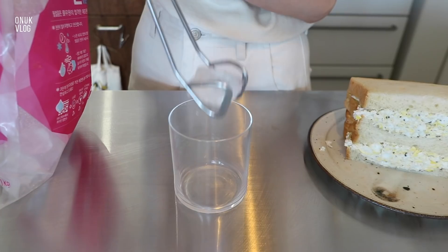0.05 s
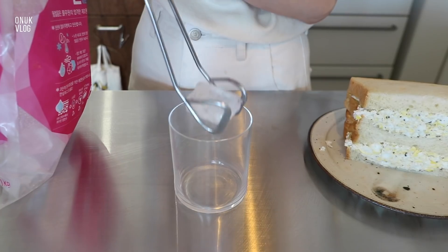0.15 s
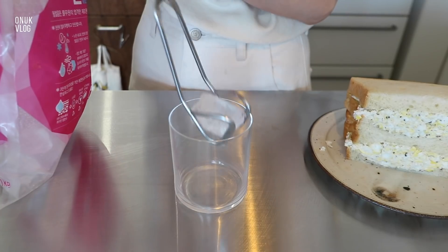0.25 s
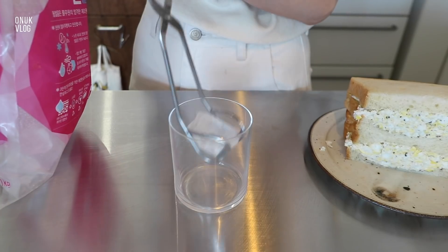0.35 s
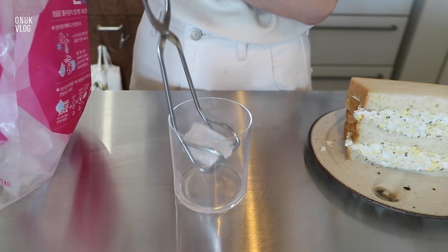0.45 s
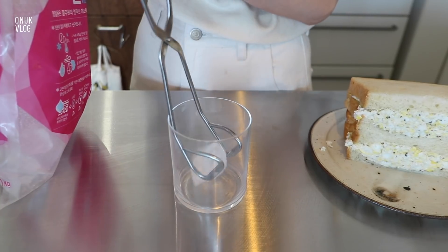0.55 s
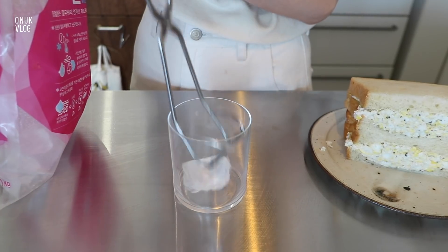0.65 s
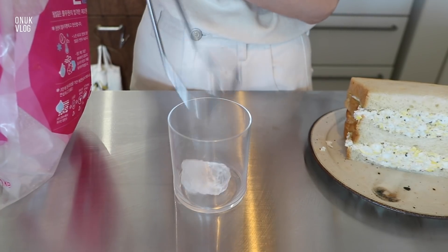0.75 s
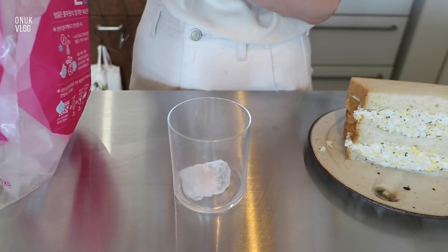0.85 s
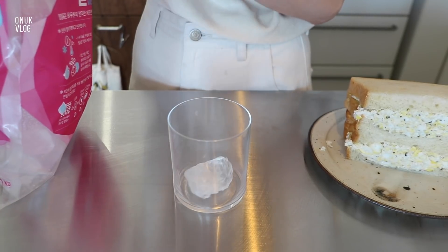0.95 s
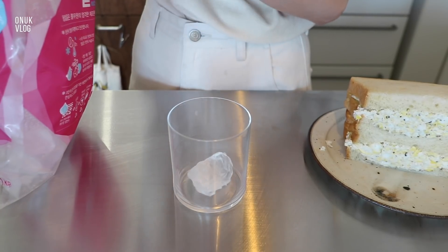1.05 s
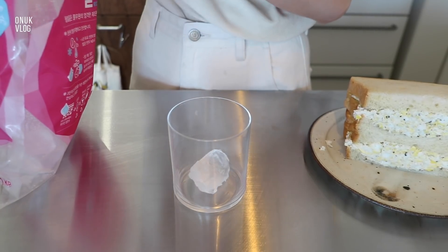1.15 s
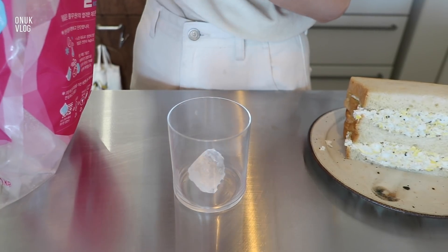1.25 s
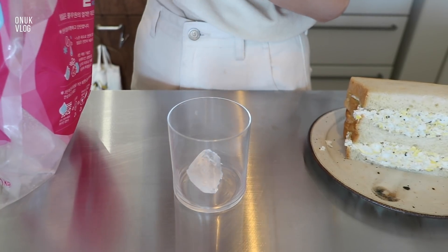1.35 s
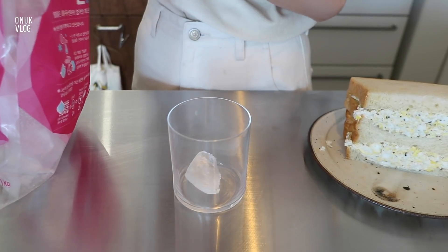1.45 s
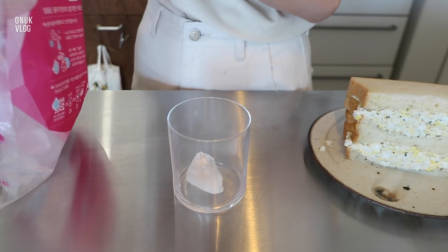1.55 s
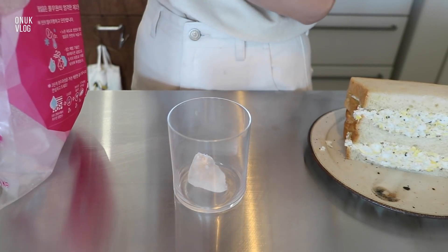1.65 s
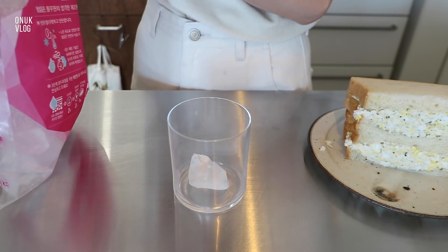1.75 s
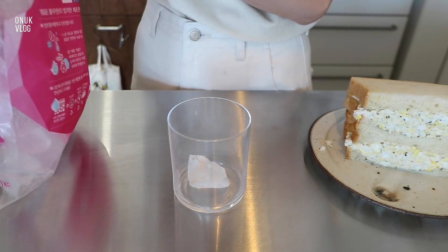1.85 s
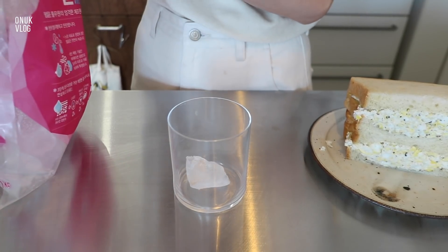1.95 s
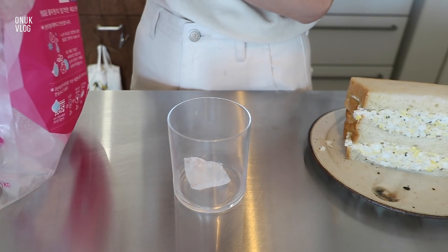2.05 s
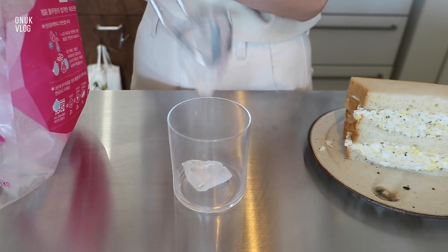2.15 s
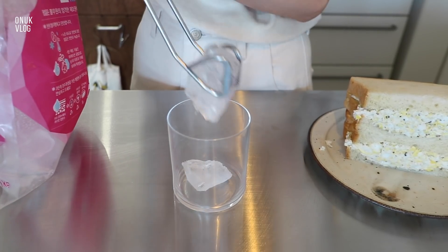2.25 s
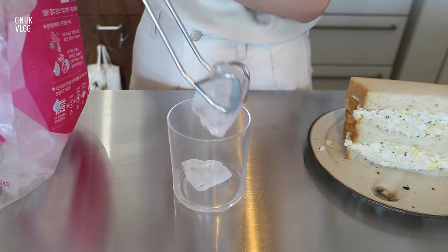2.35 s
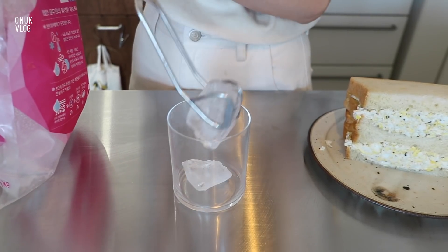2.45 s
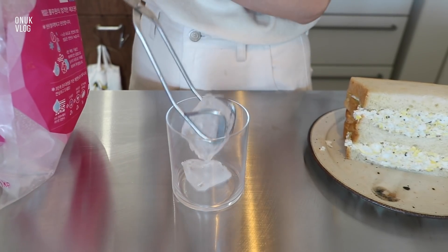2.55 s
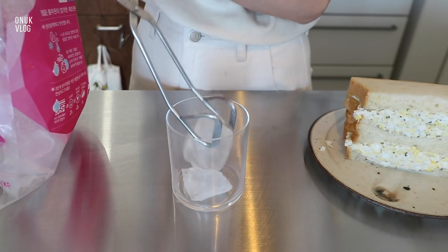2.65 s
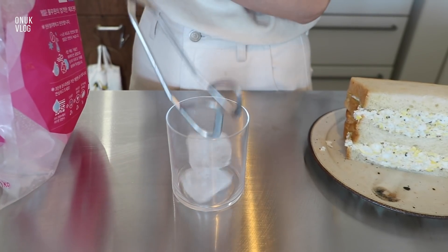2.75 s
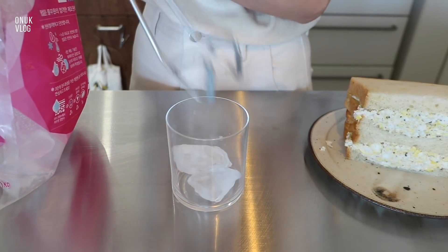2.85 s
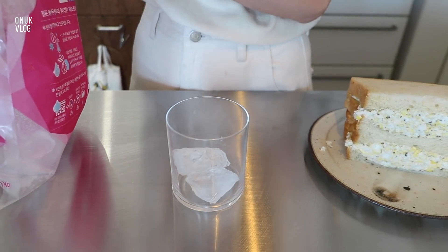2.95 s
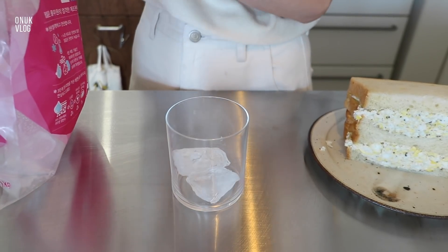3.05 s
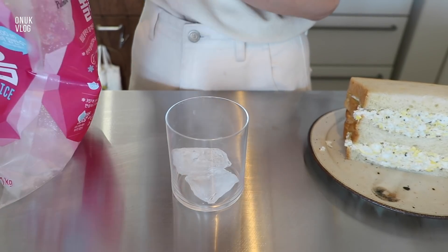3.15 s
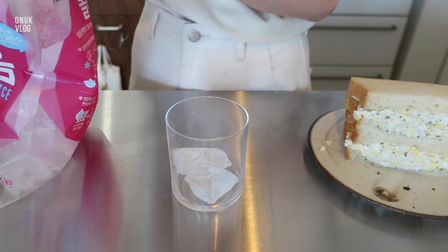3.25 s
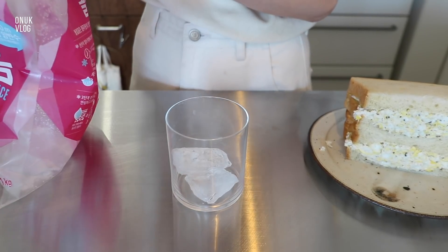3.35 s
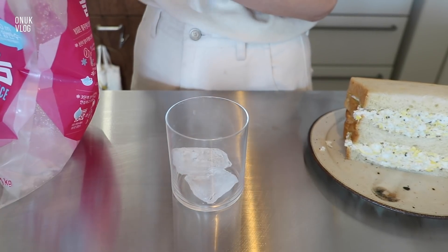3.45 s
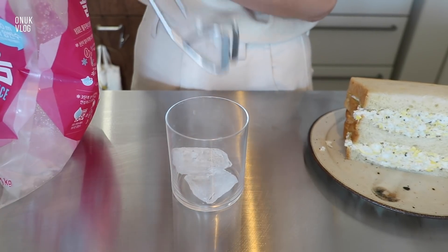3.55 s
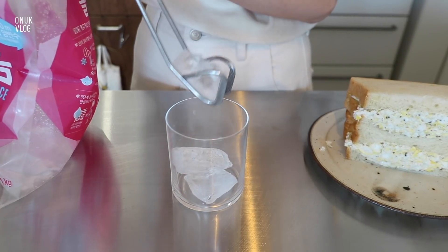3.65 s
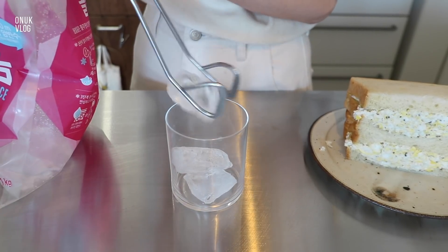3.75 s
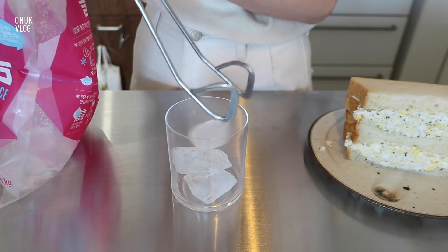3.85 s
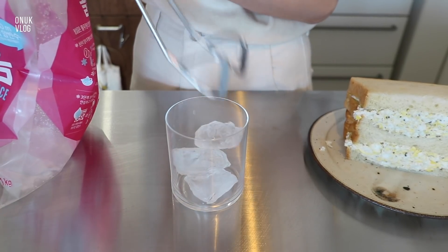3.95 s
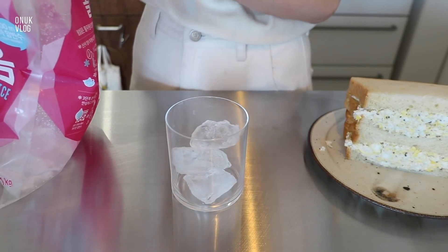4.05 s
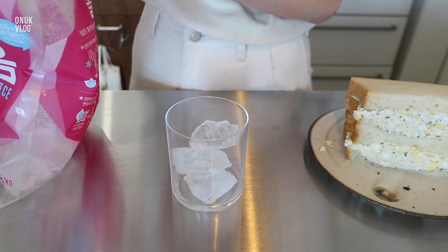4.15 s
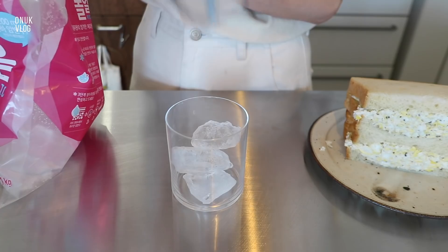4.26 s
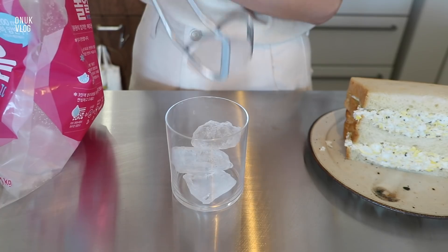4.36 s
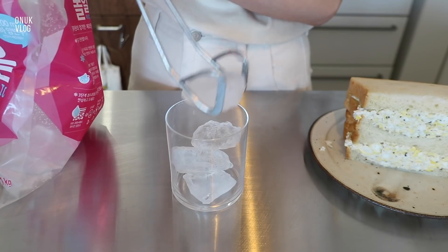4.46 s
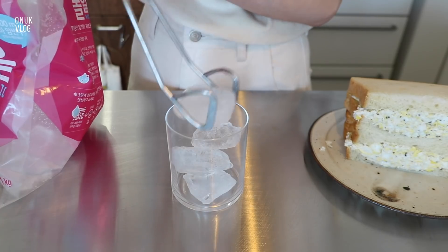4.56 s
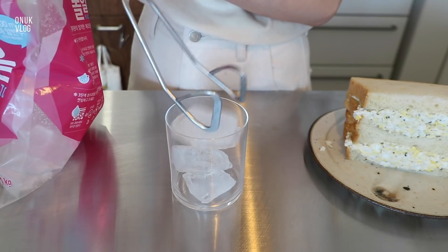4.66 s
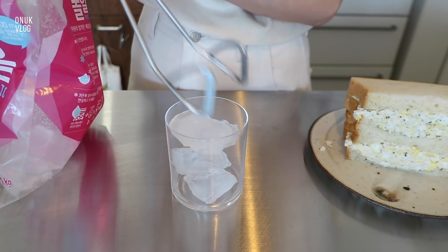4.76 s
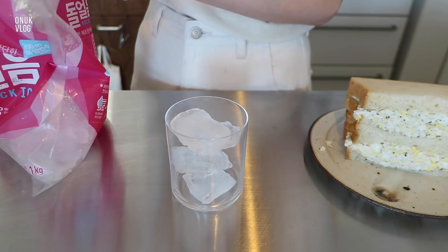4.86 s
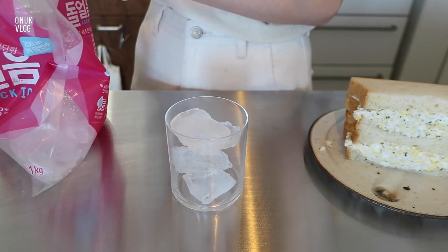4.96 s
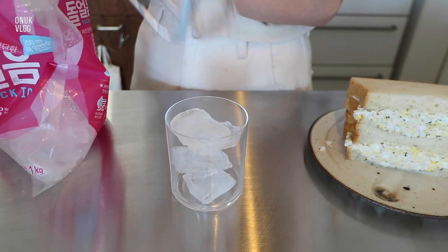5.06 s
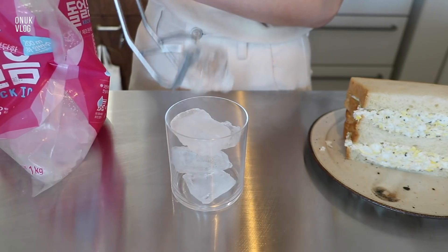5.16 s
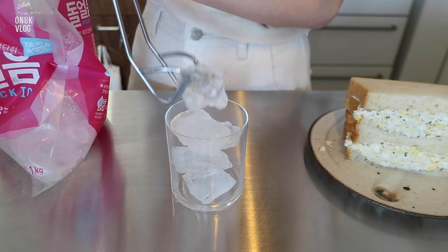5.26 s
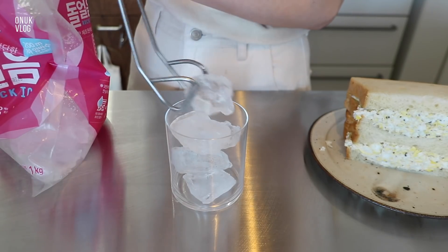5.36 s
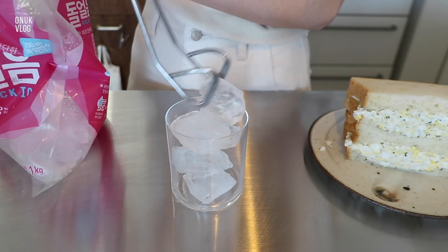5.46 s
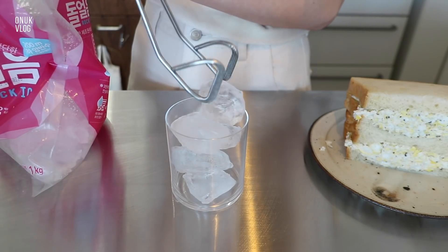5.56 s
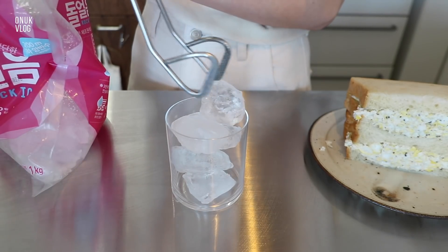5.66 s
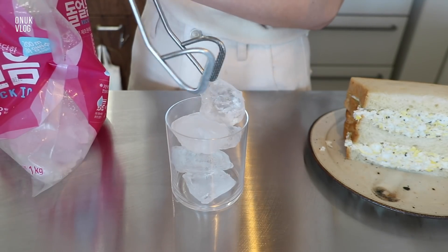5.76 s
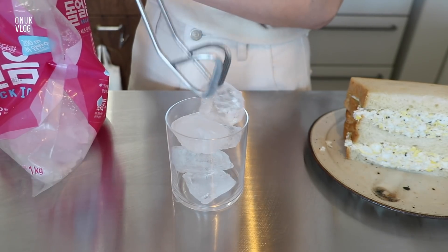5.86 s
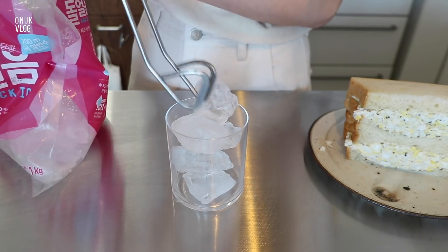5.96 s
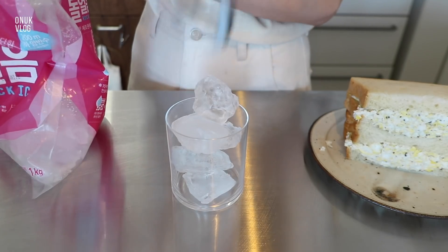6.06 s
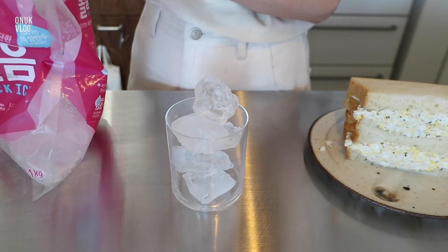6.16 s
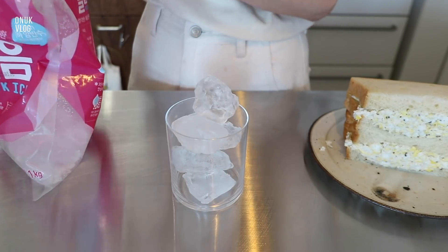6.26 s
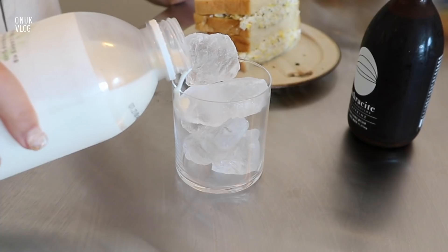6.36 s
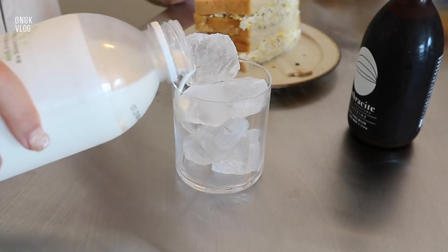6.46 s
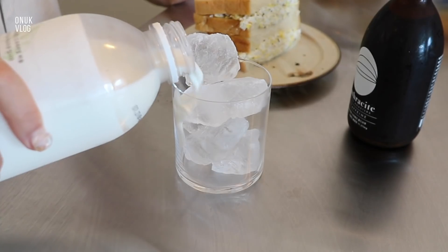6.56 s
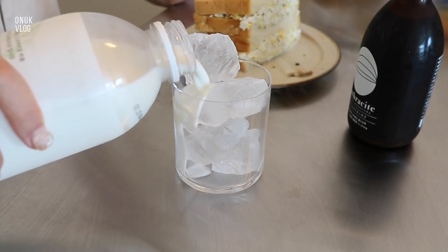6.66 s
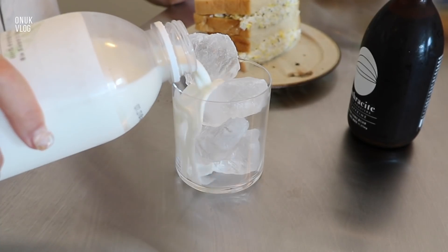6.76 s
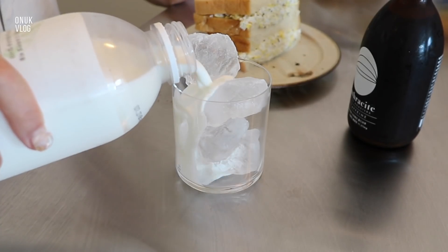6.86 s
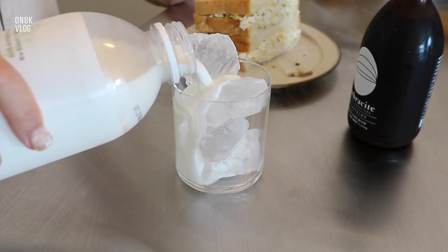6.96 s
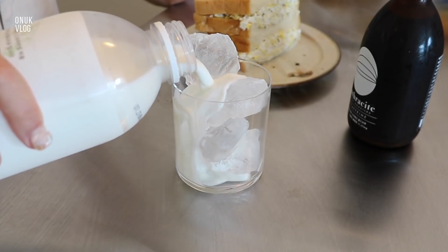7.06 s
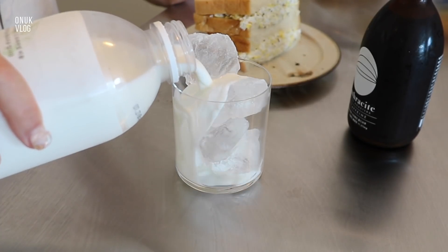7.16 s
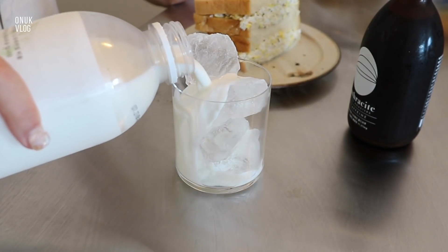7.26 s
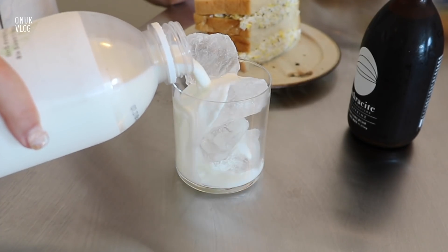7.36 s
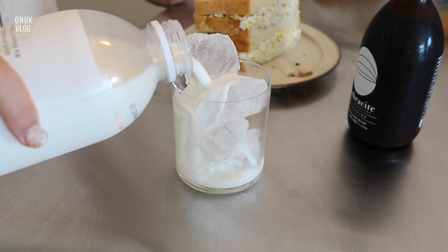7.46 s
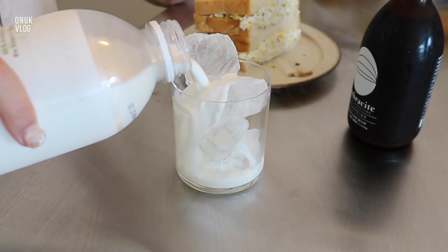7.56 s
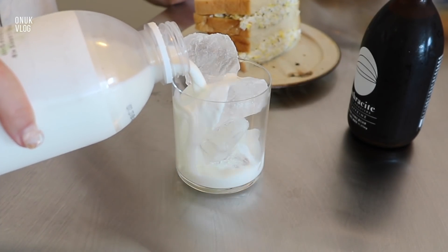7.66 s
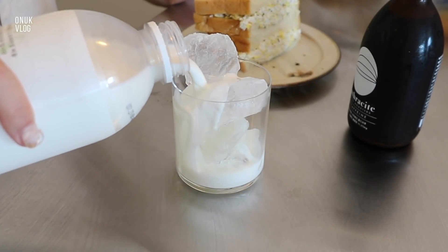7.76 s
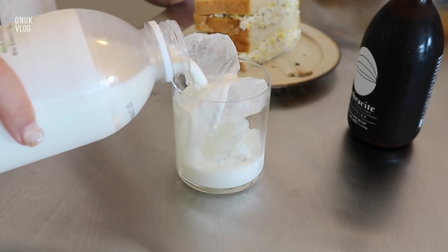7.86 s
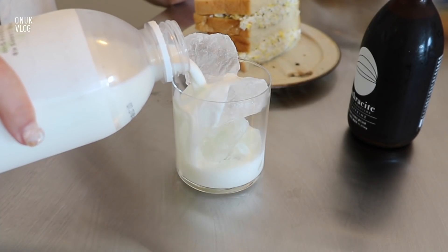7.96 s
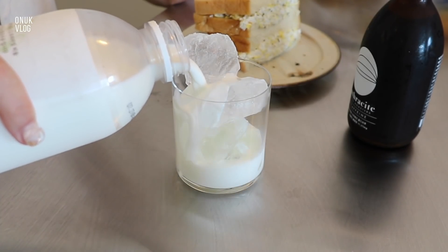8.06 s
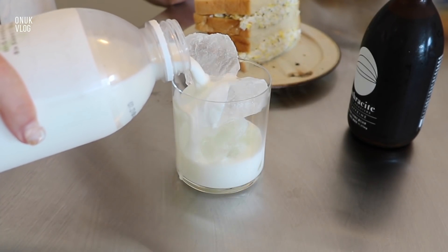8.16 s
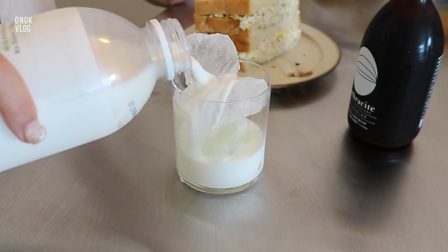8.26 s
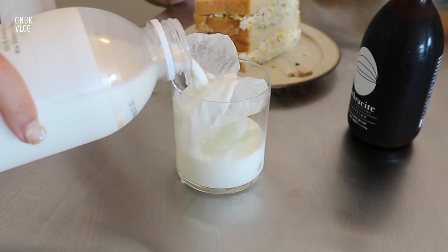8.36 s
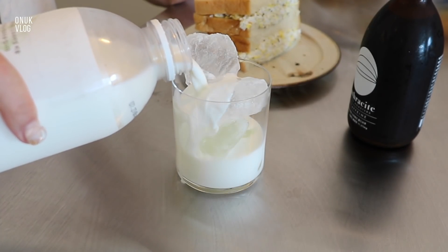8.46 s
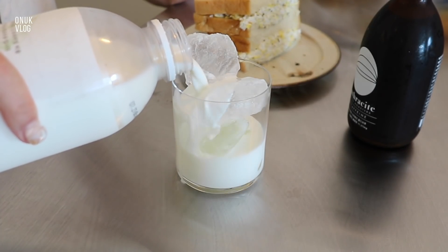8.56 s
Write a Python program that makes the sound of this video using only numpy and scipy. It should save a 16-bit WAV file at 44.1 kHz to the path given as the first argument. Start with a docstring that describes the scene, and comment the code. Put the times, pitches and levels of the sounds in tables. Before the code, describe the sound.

Close-up ice drops clink and crack in a glass on a steel counter; a bag crackles between them, then faint ice shifts end it.

```python
"""A low kitchen hum, then ice cubes lifted with tongs from a plastic bag drop into a tumbler on a steel counter.
Each blow cracks, thuds in the counter, pops the air in the glass, clacks and rings the wall; cubes chatter on.
Between drops the bag crackles, its heap of ice rumbles and cubes knock; later milk makes the ice shift.
Two microphone ports hear it from close by, over a kitchen echo. The scene is edited: at each cut
the foreground fades out and the wall's ringing, the chatter and the echo stop, while the hum runs on."""
import sys
import numpy as np
from scipy import signal
from scipy.fft import rfft, irfft, next_fast_len
from scipy.io import wavfile

SR = 44100
rng = np.random.default_rng(int(sys.argv[2]) if len(sys.argv) > 2 else 0)


def wav_out(sig):
    """Save sig, one row per channel (or a flat mono array), as 16-bit PCM at SR to the path in sys.argv[1]."""
    wavfile.write(sys.argv[1], SR, np.round(np.clip(np.atleast_2d(sig).T, -1, 1) * 32767).astype(np.int16))


N = 380141
SIDES = np.array([[1], [-1]])   # plus for the left channel, minus for the right

# Moments where a stretch of the scene begins, in seconds.
CUTS_S = [0, 2.211, 4.876, 6.345]


def amp(db):
    """Decibels to gain."""
    return 10 ** (np.asarray(db) / 20)


def rms_one(x):
    """Scale to rms 1."""
    return x / np.sqrt(np.mean(x ** 2) + 1e-20)


def at_hz(points, hz, column=1):
    """Read a table on a log-frequency axis."""
    p = np.array(points)
    return np.interp(np.log(hz + 1), np.log(p[:, 0] + 1), p[:, column])


def stretches(x):
    """The pieces of a signal between the cuts."""
    return np.split(x, [round(s * SR) for s in CUTS_S[1:]], axis=-1)


def between_cuts(process, x):
    """Each stretch between cuts is processed alone, so no tail crosses a cut."""
    return np.concatenate([process(part) for part in stretches(x)], axis=-1)


def stereo_noise(mid, side, alike):
    """Two independent noises become left and right with a given likeness, from -1 to 1."""
    return np.sqrt(1 + alike) * mid + np.sqrt(1 - alike) * side * SIDES


def hum():
    """Steady kitchen noise, shaped in frequency and alike in both channels in the bass."""
    # Each row: frequency in Hz, relative level in dB per Hz.
    hum_spectrum = [(12, -31), (20, -13), (49, -7), (129, -0.5), (207, -4), (238, 0), (266, -8.5),
                    (297, -9.5), (451, -13), (745, -16), (1070, -18.5), (1260, -20), (2470, -24),
                    (9370, -36.5), (15500, -48)]
    # Each row: frequency in Hz, left-right likeness.
    hum_likeness = [(60, 0.99), (180, 0.98), (550, 0.094), (1650, -0.33), (4970, -0.11), (15000, -0.56)]
    level_db = -45.5
    hz = np.fft.rfftfreq(N, 1 / SR)
    alike = np.clip(at_hz(hum_likeness, hz), -1, 1)
    white = rng.standard_normal((2, len(hz), 2)) @ [1, 1j]
    mid, side = white * amp(at_hz(hum_spectrum, hz))
    return amp(level_db) * rms_one(irfft(stereo_noise(mid, side, alike), N))


def clicks(times, db):
    """Single-sample blows."""
    out = np.zeros(N)
    np.add.at(out, np.round(np.asarray(times) * SR).astype(int), amp(db))
    return out


def burst(times, db, low_hz, high_hz, t60):
    """A crack is band-limited noise that swells in about a millisecond and dies with the given t60."""
    shape = signal.lfilter([1], [1, -amp(-60 / (t60 * SR))], clicks(times, db) + 1e-18)
    shape = signal.lfilter([.04], [1, -.96], shape)   # soft onset
    band = signal.butter(3, [low_hz, high_hz], "band", fs=SR, output="sos")
    return signal.sosfilt(band, shape * rng.standard_normal(N))


def pitched(times, db, pitches, t60, spread, after_db):
    """A short tone per blow, roughened by three neighbours; a quick fall, then a weak after-ring."""
    out, t = np.zeros(N + SR), np.arange(SR // 8) / SR
    fall = amp(-60 * t / t60) + amp(after_db - 15 * t / t60)
    fall *= np.minimum(t / .0015, 1)   # soft attack
    lucks = rng.uniform(-0.844, 1, (len(times), 3, 1))
    for s, gain, hz, luck in zip(times, amp(db), pitches, lucks):
        neighbours = np.sin(2 * np.pi * hz * (1 + spread * luck) * t).sum(axis=0)
        tone = np.sin(2 * np.pi * hz * t) + 0.4 * neighbours
        out[round(s * SR):][:len(t)] += gain * tone * fall
    return out[:N]


def ring(x, hz, t60):
    """A unit click sets a sine of height 1 ringing; it dies faster the fuller the glass, and stops at a cut."""
    # Share of the decay time left in each stretch, as ice and then milk load the wall.
    ring_share = [1., .85, .5, .2]
    w, out = 2 * np.pi * hz / SR, []
    for part, share in zip(stretches(x), ring_share):
        r = amp(-60 / (t60 * share * SR))
        out.append(signal.lfilter([0, np.sin(w)], [1, -2 * r * np.cos(w), r * r], part + 1e-18))
    return np.concatenate(out)


def wobble(depth):
    """Ice resting on a ringing wall makes its tone flutter: noise mostly below a hundred hertz; rms 1."""
    flutter = rms_one(signal.lfilter([1], [1, -1.97, .970225], rng.standard_normal(N)))
    return rms_one(1 + depth * flutter)


def struck(modes, times, db, chatter, crunch_s, width, rough):
    """A blow is a crunch of six contacts: the first on time, on average the strongest, five weaker ones
    scattered just after; the modes they ring lean left and right alternately."""
    late = crunch_s * rng.exponential(1, (len(times), 6)) * (np.arange(6) > 0)   # the first is on time
    shape = (len(times), len(modes), 6)
    luck = rng.uniform(.4, 1, shape) * rng.choice([-1, 1], shape)
    luck *= amp(rng.normal(0, 3.5, (len(times), len(modes), 1)))   # the spot struck favours some modes
    at, out = np.round((times[:, None] + late) * SR).astype(int), 0
    flutter = wobble(rough)
    for k, (hz, level_db, t60) in enumerate(modes):
        contacts = chatter.copy()
        np.add.at(contacts, at, amp(db)[:, None] * luck[:, k] * 0.71 ** np.arange(6))
        # one flutter serves all modes, shifted in time for each
        tone = amp(level_db) * ring(contacts, hz, t60) * np.roll(flutter, 997 * k)
        out = out + tone * (1 + width * (-1) ** k * SIDES)
    return out


def free_rings():
    """A few blows leave clear tones ringing until damped: the glass wall, or briefly the tongs or a cube."""
    # Each row: start in seconds, frequency in Hz, level in dB, time of damping in seconds.
    free_tones = [(0.524, 3800, -29, .56), (0.651, 8440, -27, .684), (0.684, 8440, -26, .77),
                  (0.684, 3384, -37, .886), (0.802, 8440, -22, .9), (0.886, 3384, -51, .953),
                  (2.34, 1109, -35, 2.41), (2.34, 5098, -49, 2.53), (2.34, 2105, -45, 2.53),
                  (2.563, 3560, -27, 2.6), (2.658, 5098, -42, 2.74), (2.658, 3384, -34, 2.697),
                  (2.744, 2105, -30, 2.766), (2.81, 1109, -25, 2.88), (2.905, 1109, -15, 2.955),
                  (2.905, 5098, -32, 3.06), (2.912, 3384, -32, 3.02), (2.981, 2105, -33, 3.075),
                  (3.824, 3384, -33, 3.925)]
    # Tones that can ring freely: frequency in Hz to t60 in seconds.
    free_t60_s = {1109: .22, 2105: .5, 3384: .9, 3560: .07, 3800: .06, 5098: .22, 8440: .12}
    out = np.zeros(N)
    for s, hz, db, damped_s in free_tones:
        t = np.arange(round((damped_s - s + .02) * SR)) / SR
        damping = np.exp(-np.maximum(t - damped_s + s, 0) / .003)
        tone = amp(db - 60 * t / free_t60_s[hz]) * np.sin(2 * np.pi * hz * t)
        out[round(s * SR):][:len(t)] += tone * damping
    return out


def grains(per_s, spread_db):
    """Random clicks of very uneven size; rms 1."""
    sizes = amp(spread_db * np.minimum(rng.exponential(1, N), 4)) * rng.choice([-1, 1], N)
    return rms_one(sizes * (rng.random(N) < per_s / SR))


def chattering(times, db):
    """Cubes chatter on after each clack: tiny contacts that die away and stop at a cut."""
    level_db, t60_s = -39.5, 0.5   # t60 of the unrest that drives the chatter
    follows = 0.67   # share of the unrest's swing in dB that the chatter follows
    r = amp(-60 / (t60_s * SR))
    unrest = between_cuts(lambda part: signal.lfilter([1], [1, -r], part + 1e-18), clicks(times, db))
    return amp(level_db) * unrest ** follows * grains(600, spread_db=2.5)


def glass():
    """Ice on glass: crack, counter thud, air pop, clack, crunch, wall modes, and chatter between blows."""
    # Each row: start in seconds, then levels in dB of the crack, the thud on the base,
    # the ice-on-ice clack and the ring of the wall.
    blow_rows = [(0.524, -17, -27.5, -39, -30.5), (0.564, -23, -37.5, -51, -41),
                 (0.617, -18, -32.5, -32, -34), (0.649, 0.5, -14.5, -19, -36),
                 (0.684, -12, -18, -19.5, -45), (0.722, -34, -33, -40, -69), (0.775, -30, -27, -30, -44),
                 (0.801, -25, -34, -34, -55.5), (0.887, -24, -34.5, -56, -54),
                 (0.954, -41, -29, -30, -49.5), (0.986, -17.5, -45, -51, -59), (1.061, -26, -65, -47, -73),
                 (2.318, -37, -18.5, -36, -29), (2.339, -7.5, -18, -39, -50), (2.563, -13.5, -27, -32, -35),
                 (2.659, -31, -18.5, -34, -41.5), (2.68, -17, -25, -30, -54),
                 (2.744, -17, -29.5, -21.5, -31.5), (2.759, -23, -17, -22, -27.5),
                 (2.767, -6, -10, -11.5, -56), (2.811, -24, -47, -13.5, -30), (2.853, -17, -30, -21, -52),
                 (2.878, -14, -27, -14.5, -34.5), (2.905, -9, -24, -12, -26), (2.954, -34, -33, -19, -45),
                 (2.98, -6, -55, -15, -43), (3.085, -22.5, -67, -61, -70), (3.353, -19, -56, -34, -51.5),
                 (3.49, -24.5, -39.5, -53, -80), (3.824, 4, -17.5, -10.5, -30),
                 (3.928, -15, -23, -13, -31.5), (3.94, -1.5, -28, -12.5, -26),
                 (3.949, -11, -25.5, -14, -33), (3.966, -25, -36, -20, -56), (4.002, -13, -24, -11.5, -32),
                 (4.198, -60, -53, -37.5, -75), (4.237, -69, -39, -38.5, -48),
                 (4.659, -10, -18.5, -12.5, -27.5), (4.668, -15, -22, -36, -52),
                 (4.694, -31, -34, -23, -46), (4.731, -2.5, -16.5, -16, -32.5),
                 (4.743, -5, -15, -15.5, -49), (4.756, 0.5, -20, -9.5, -29), (4.797, -10, -37, -14.5, -39),
                 (4.836, -19, -28.5, -27, -51), (5.402, -15, -22.5, -27.5, -47),
                 (5.421, -9.5, -25.5, -18, -44), (5.444, -25, -47, -41, -63), (5.466, -41, -24.5, -34, -73),
                 (5.515, -29, -15, -11.5, -34.5), (5.523, -5.5, -18, -14, -38),
                 (5.538, -7.5, -26, -50, -36.5), (5.561, -11.5, -32, -43, -37.5),
                 (5.586, -33, -26, -23, -54), (5.631, -14.5, -28, -25, -38), (5.649, -41, -27.5, -58, -63),
                 (5.924, -27, -22.5, -29, -51), (5.946, -6, -20.5, -17, -36), (6.008, -19, -31, -29, -43.5),
                 (6.212, -29, -37.5, -40, -66), (6.23, -31, -39, -53, -36.5), (7.771, -51, -58, -26.5, -75),
                 (7.856, -40.5, -70, -60, -55.5), (7.9, -50, -72, -37, -49), (8.108, -44, -63.5, -32, -52),
                 (8.308, -43, -52, -45, -46)]
    # As the glass fills. Each row: time in seconds, air pop in Hz, air pop over the thud in dB,
    # clack in Hz, top wall modes over the ring of the wall in dB.
    fill_rows = [(0.65, 925, 5, 2490, -5.5), (2.33, 912, -1.5, 2660, 1.5), (2.67, 916, 6.5, 2400, -8),
                 (2.77, 958, 7, 2400, -5), (2.91, 1027, 6, 2397, -6), (3.9, 1045, 8, 2480, -6.5),
                 (4.7, 907, 3.5, 2328, -4), (5.5, 838, -1, 2295, -3.5), (5.95, 806, -6.5, 2130, -4.5),
                 (7.9, 900, 4, 2317, -6), (8.3, 900, 1, 2400, 7)]
    # Steel counter, then the wall's bright and top families. Each row: frequency in Hz, level in dB,
    # t60 in seconds before ice and milk load the wall.
    counter_modes = [(168.4, -15.5, 0.26), (254.4, -1, 0.14), (286, -1, 0.027), (388, -12.5, 0.051),
                     (429.2, -4.5, 0.084), (530, -5.5, 0.089), (619, -7, 0.054), (705, -8, 0.079),
                     (1290, -16.5, 0.11), (1632, 2.5, 0.0089)]
    bright_modes = [(6940, -1., .2), (7100, -3., .1), (7260, -3., .15), (7434, 0., .18), (7640, -3., .12),
                    (7900, -6., .1), (8195, -4., .16), (8426, -7., .13), (8664, -9., .13), (8796, -9., .12)]
    top_modes = [(9540, -1, 0.076), (10400, 1, 0.095), (10430, -8, 0.04), (10220, -6.5, 0.093),
                 (10190, -24, 0.024), (10760, 0, 0.043), (12440, 5, 0.032), (12800, -12, 0.069),
                 (12810, -17, 0.093), (13380, -2, 0.091), (12900, -7, 0.12), (14220, -8, .08)]

    s, crack_db, thud_db, clack_db, wall_db = np.transpose(blow_rows)
    at, *columns = np.transpose(fill_rows)
    pop_hz, pop_db, clack_hz, top_db = (np.interp(s, at, c) for c in columns)
    stray = 1 + .03 * rng.standard_normal((len(s), 2))   # each blow strays a little in pitch
    chatter = chattering(s, clack_db)

    out = burst(s, crack_db, 344, 3930, t60=0.016)
    crunch_db = np.maximum(wall_db + 12.5, clack_db - 7.5)   # goes with the stronger of ring and clack
    out += burst(s, crunch_db, 2800, 5680, t60=0.047)
    out += wobble(.35) * free_rings()
    out += pitched(s, thud_db + pop_db, pop_hz * stray[:, 0], t60=0.034, spread=0.203, after_db=-16)
    out += pitched(s, clack_db, clack_hz * stray[:, 1], t60=0.028, spread=0.173, after_db=-17)
    # a cube's second mode: ratio to the clack, with its own scatter
    second_hz = clack_hz * 1.9 * (1 + .15 * rng.uniform(-1.034, 1, len(s)))
    out += pitched(s, clack_db - 13, second_hz, t60=.018, spread=0.0993, after_db=-25.5)

    # air and ice answer the chatter too: Hz, dB, t60 in seconds before loading
    loose = [(930, -21.5, 0.016), (2400, -27.5, 0.02), (4300, -49.0, .008)]
    out += sum(amp(db) * ring(chatter, hz, t60) for hz, db, t60 in loose)
    # the chatter heard directly as a rough scrape
    scrape_band = signal.butter(2, [1500, 6000], "band", fs=SR, output="sos")
    out += amp(-13.5) * signal.sosfilt(scrape_band, chatter)

    out = out + struck(counter_modes, s, thud_db, amp(-25.5) * chatter,
                       crunch_s=.004, width=0.033, rough=0.48)
    out += struck(bright_modes, s, wall_db, amp(-44) * chatter,
                  crunch_s=0.0045, width=0.59, rough=0.98)
    return out + struck(top_modes, s, wall_db + top_db, amp(-52.0) * chatter,
                        crunch_s=0.0077, width=0.23, rough=0.49)


def ports(x):
    """The two microphone ports hear the near blows with a phase step that mostly grows with pitch."""
    # Each row: frequency in Hz, phase in radians by which the left port leads.
    port_phase = [(0, 0), (1500, .15), (2240, .4), (3530, 1.2), (4570, 1.), (5940, 8.4), (8180, 8.5),
                  (9000, 15.5), (11500, 19.), (14400, 22.)]
    size = next_fast_len(x.shape[-1])
    turn = np.exp(.5j * at_hz(port_phase, np.fft.rfftfreq(size, 1 / SR)) * SIDES)
    return irfft(rfft(x, size) * turn, size)[:, :x.shape[-1]]


def kitchen(x):
    """Echo as noise dying octave by octave; both channels share the bass."""
    # Each row: frequency in Hz, relative level in dB, t60 in seconds, left-right likeness.
    echo_bands = [(148, -27.5, 0.52, 1), (474, -0.5, 0.39, 0.89), (1650, -5, 0.22, 0.33),
                  (4000, -2.5, 0.17, 0.16), (10000, -11.5, 0.36, 0.029)]
    level_db = -34.0
    t, tail = np.arange(SR // 2) / SR, 0
    for low in 100 * 2. ** np.arange(8):
        hz = low * 1.4   # middle of the octave
        band = signal.butter(2, [low, min(2 * low, .45 * SR)], "band", fs=SR, output="sos")
        mid, side = signal.sosfilt(band, rng.standard_normal((2, len(t))))
        alike = np.clip(at_hz(echo_bands, hz, column=3), 0, 1)
        decay_db = at_hz(echo_bands, hz) + level_db - 60 * t / at_hz(echo_bands, hz, column=2)
        tail = tail + stereo_noise(mid, side, alike) * amp(decay_db) * np.minimum(t / 0.01, 1)
    return between_cuts(lambda part: signal.fftconvolve(part[None], tail, axes=1)[:, :len(part)], x)


def gains(tables):
    """Level columns of several stretches as gains, silent between them."""
    t, out = np.arange(N) / SR, 0
    for rows in tables:
        s, *columns = np.transpose(rows)
        out = out + np.array([amp(np.interp(t, s, c, -200, -200)) for c in columns])
    return out


def coloured(x, spectrum):
    """Give white sound a spectrum; rms 1."""
    size = next_fast_len(N)
    gain = amp(at_hz(spectrum, np.fft.rfftfreq(size, 1 / SR)))
    return rms_one(irfft(rfft(x, size) * gain, size)[..., :N])


def crackle():
    """Plastic grains in clumps, each ringing a few cycles at one of 14 pitches, which lean to alternate sides."""
    # Each row: frequency in Hz, relative level in dB per Hz.
    crisp_spectrum = [(700, -6.5), (1100, 7), (2000, 0.5), (4000, -6), (6500, -11.5), (7800, -21),
                      (12000, -25)]
    slow = rms_one(signal.lfilter([1], [1, -1.996, .996004], rng.standard_normal(N)))
    snaps = amp(2.5 * slow) * grains(7000, spread_db=3.5)
    dealt, out = rng.integers(0, 14, N), 0   # which pitch each grain gets
    for k, hz in enumerate(np.geomspace(700, 12000, 14)):
        r, w = amp(-60 * hz / (7 * SR)), 2 * np.pi * hz / SR
        # steep skirts keep each grain's colour
        twice = [[0.79, 0.015, -0.98, 1, -2 * r * np.cos(w), r * r]] * 2
        tone = rms_one(signal.sosfilt(twice, snaps * (dealt == k) + 1e-18))
        lean = np.clip(1.6 * hz / 3000, 0, 1.5) * (-1) ** k
        out = out + amp(at_hz(crisp_spectrum, hz)) * np.sqrt(hz) * tone * (1 + lean * SIDES)
    return rms_one(out)


def bag():
    """Tongs rummage in the bag: plastic crackles, the heap of ice rumbles, single cubes knock."""
    # Effort of the tongs, one list per spell. Each row: time in seconds, level in dB.
    rummage_spells = [
        [(1.0, -51), (1.096, -52.5), (1.33, -39), (1.39, -49.5), (1.602, -37), (1.66, -42), (1.748, -31),
         (1.872, -63), (1.886, -24.5), (2.0, -28), (2.211, -32)],
        [(3.1, -63), (3.118, -49), (3.196, -56.5), (3.374, -49.5), (3.55, -59)],
        [(4.15, -48.5), (4.255, -53), (4.265, -41), (4.4, -64)],
        [(4.88, -58), (4.934, -42.5), (5.05, -79)],
        [(6.04, -54.5), (6.15, -41), (6.308, -39.5), (6.345, -41)],
    ]
    # Rumble of the heap. Each row: frequency in Hz, relative level in dB per Hz.
    dull_spectrum = [(29, -59), (50, -14), (135, -0.5), (253, -0.5), (363, -6.5), (604, -14.5), (900, -17),
                     (1170, -46.5), (1980, -120)]
    # Each row: start in seconds, sharp knock in dB, dull knock in dB.
    knock_rows = [(1.162, -27, -51), (1.208, -21, -21.5), (1.302, -30, -16), (1.315, -24.5, -19),
                  (1.413, -34, -23), (1.504, -29, -44), (1.604, -44, -18.5), (1.703, -24, -10),
                  (1.751, -17, -39), (1.848, -27.5, -12.5), (1.882, -12.5, -38), (1.946, -17, -10),
                  (1.968, -23, -18), (1.998, -12, -11), (2.128, -24, -33), (2.192, -20.5, -4),
                  (2.201, -22, -49), (4.262, -27, -34), (6.11, -37, -21)]
    effort = gains(rummage_spells)[0]
    s, sharp_db, dull_db = np.transpose(knock_rows)
    rumble = amp(-1) * coloured(grains(300, spread_db=3.5), dull_spectrum)
    out = effort * (rumble + crackle())
    out = out + burst(s, sharp_db - 6.0, 1140, 5600, t60=0.0078)
    out += burst(s, sharp_db, 450, 3600, t60=0.041)
    return out + burst(s, dull_db, 120, 1490, t60=0.041)


def scene():
    """Blows radiate no deep bass and reach the ports from close by; blows and bag echo over the hum."""
    blows = signal.sosfilt(signal.butter(4, 130, "high", fs=SR, output="sos"), glass())
    rustle = bag()
    near = ports(blows) + rustle + kitchen((blows + rustle).mean(axis=0))
    t = np.arange(N) / SR
    to_cut = np.min([np.where(t < s, s - t, 1) for s in CUTS_S[1:]], axis=0)
    cut_fade = np.minimum(to_cut / .004, 1)   # the last 4 ms before each cut
    return near * cut_fade + hum()


def record(dry):
    """The loudest peaks clip, then a steep low-pass removes what lies above 16.1 kHz."""
    low_pass = signal.cheby2(12, 60, 16100, fs=SR, output="sos")
    return signal.sosfilt(low_pass, np.clip(dry, -.97, .97))


dry = scene()
out = record(dry)
wav_out(out)
```